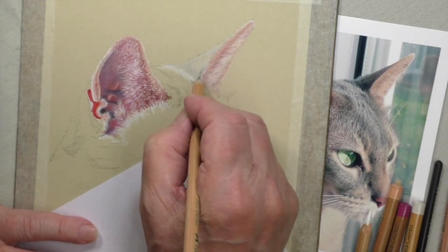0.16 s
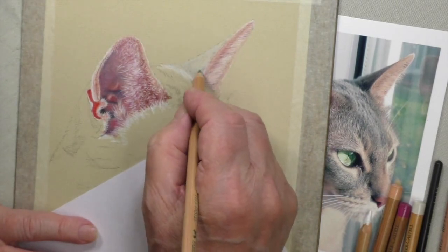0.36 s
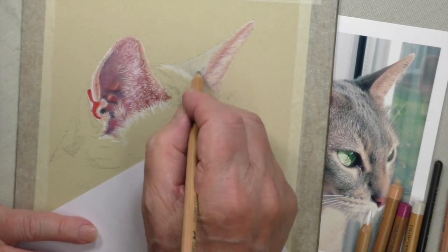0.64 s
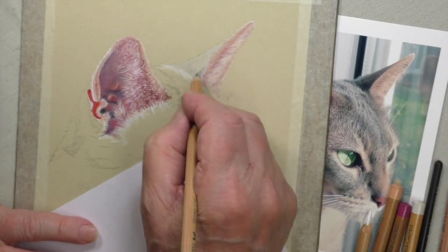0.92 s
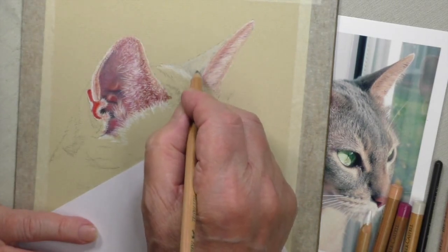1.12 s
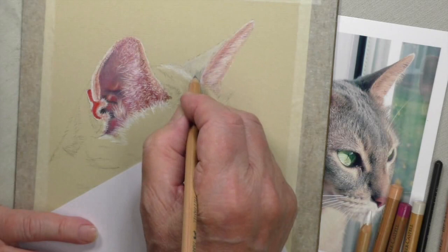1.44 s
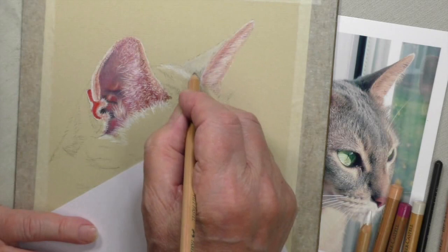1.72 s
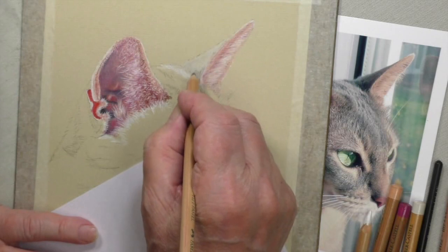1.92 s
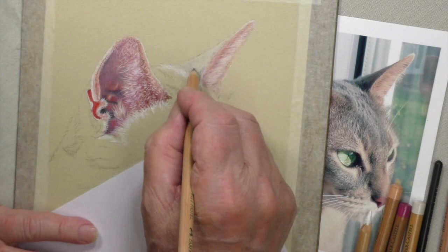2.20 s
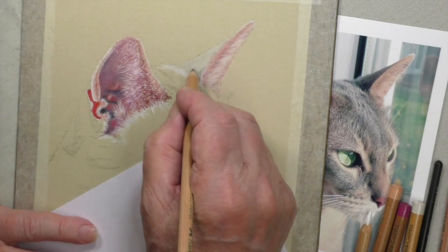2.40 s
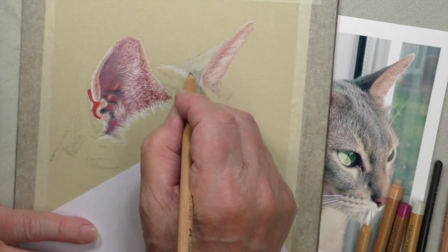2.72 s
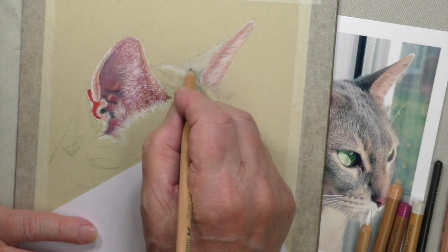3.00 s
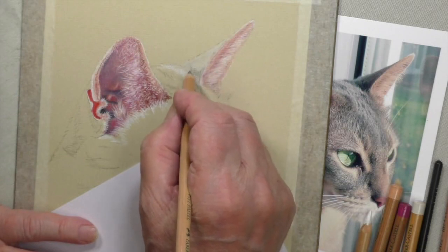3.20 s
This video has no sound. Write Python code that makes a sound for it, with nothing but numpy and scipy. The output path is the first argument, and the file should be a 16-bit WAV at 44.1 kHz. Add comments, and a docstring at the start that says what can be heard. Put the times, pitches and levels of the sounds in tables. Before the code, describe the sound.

A pastel pencil draws short strokes on board-backed paper, close in a small dry room. From 0 to 1.4 s, light, crisp, hissing scratches come about every quarter second, most beginning with a dull tap, strongest near 1.0 s. A quick pair falls around 1.45-1.65 s. Then strokes grow louder, duller and woodier, slightly softer near 2.4-2.6 s, with taps nearly gone after 2.2 s. Faint low hum and hiss continue to 3.4 s.

```python
"""In a quiet room, close by, a pastel pencil lays short, quick strokes on paper fixed to a drawing board.
The tip mostly taps down first: a dull push that rings the board. It then drags over the paper's tooth.
Tiny random impacts drum on the board's modes, mostly louder and duller in the later strokes,
and coloured noise gives the hiss of crumbling pigment, which follows the tip's speed.
A low wavering hum (sines) and a faint hiss (noise) lie underneath."""
import sys
import numpy as np
from scipy import signal
from scipy.fft import rfft, irfft, next_fast_len
from scipy.io import wavfile
from scipy.ndimage import map_coordinates

SR = 44100
rng = np.random.default_rng(int(sys.argv[2]) if len(sys.argv) > 2 else 0)


def waveform_to_disk(signal):
    """Save audio, clipped to [-1, 1], as 16-bit WAV at the path in sys.argv[1]."""
    frames = np.transpose(np.atleast_2d(signal))
    scaled = np.clip(frames, -1, 1) * 32767
    samples = np.round(scaled).astype(np.int16)
    wavfile.write(sys.argv[1], SR, samples)


N = 147735  # length in samples

# The pencil strokes: [start/s, length/s, board level/dB, high modes over low modes/dB,
# hiss level/dB, fastest point/share of the stroke]
STROKE_TABLE = [(-.075, 0.13, -26, 11, -25, 0.41), (0.183, 0.14, -31.5, 7, -27, 0.43),
                (0.45, .13, -31, 9, -29, 0.52), (0.716, 0.14, -31, 4.5, -28.5, 0.53),
                (0.97, 0.14, -30.5, 5.5, -28, 0.33), (1.198, 0.13, -30, 4.5, -30, 0.48),
                (1.441, 0.12, -32.5, 8.5, -28.5, 0.36), (1.553, 0.12, -22.5, 6, -29.5, 0.54),
                (1.769, 0.13, -22.5, 1, -31, 0.54), (1.974, 0.12, -23, -4, -30.5, 0.61),
                (2.177, .13, -22.5, -3.5, -31, 0.55), (2.396, .108, -27.5, -1, -39, 0.56),
                (2.588, 0.13, -26, -3.5, -34.5, 0.6), (2.813, 0.14, -22, -1, -32, 0.62),
                (3.035, 0.14, -21.5, -2.5, -32.5, 0.63), (3.265, 0.13, -21, 1, -30.5, 0.73)]


def amp(db):
    """Turn decibels into a gain."""
    return 10 ** (np.asarray(db) / 20)


def unit(x):
    """Scale to an rms of 1."""
    return x / np.sqrt(np.mean(x ** 2) + 1e-20)


def along(points, hz):
    """Read a curve of (f/Hz, value) points, with the frequency on a log axis."""
    f, value = np.transpose(points)
    return np.interp(np.log(hz + 1), np.log(f + 1), value)


def wobble(rate):
    """A smooth random curve with rate new random points a second."""
    knots = rng.standard_normal(N // 20)
    return map_coordinates(knots, [np.arange(N) * rate / SR], mode="mirror")


def filtered(x, response):
    """Filter x by multiplying its spectrum with a response that depends on frequency."""
    size = next_fast_len(N + SR // 10)
    hz = np.fft.rfftfreq(size, 1 / SR)
    return irfft(rfft(x, size) * response(hz), size)[..., :N]


def stereo(pair, spectrum, alike):
    """Colour two unrelated signals and mix them into a left and right that are partly alike, at rms 1."""
    def mid_side_response(hz):
        # the angle sets how much is shared: 0 makes both sides the same
        angle = np.arccos(np.clip(along(alike, hz), -1, 1)) / 2
        return amp(along(spectrum, hz)) * [np.cos(angle), np.sin(angle)]

    mid, side = filtered(pair, mid_side_response)
    return unit(np.array([mid + side, mid - side]))


HUM_WAVER_DB, HUM_DRIFT_RAD = 0.6, 0.58  # random swing of the hum's level and phase
FLOOR_DB = -48  # rms of the room noise


def background():
    """Low hum tones, wavering in level and phase, over the room's steady coloured noise."""
    # hum tones: [f/Hz, rms level/dB]
    hum_tones = [(52.9, -52), (105.7, -53), (175.6, -52)]
    # colour of the room noise: [f/Hz, level/dB]
    floor_colour = [(20, -14), (40, -26), (75, -8), (130, -2.5), (190, -6), (280, -15.5), (500, -23),
                    (1000, -25.5), (2000, -26), (4000, -30), (8000, -28), (12000, -35), (15000, -40)]
    # how alike left and right are in the room noise: [f/Hz, correlation]
    floor_alike = [(100, 1), (1000, 0.39), (5000, 0.13)]
    t = np.arange(N) / SR
    hum = np.zeros(N)
    for hz, db in hum_tones:
        level = amp(db + HUM_WAVER_DB * wobble(5.16))
        phase = 2 * np.pi * hz * t + HUM_DRIFT_RAD * wobble(3.82)
        hum += level * np.sqrt(2) * np.sin(phase)
    noise = stereo(rng.standard_normal((2, N)), floor_colour, floor_alike)
    return hum + amp(FLOOR_DB) * noise


ROOM_WIDTH = 0.32  # share of side signal in the reflections


def room(x, count=14):
    """Fading noise as a small, dry room; the moving hand shifts the reflections in count steps."""
    # time for the reflections to fade by 60 dB: [f/Hz, fade time/s]
    fade_times = [(200, 0.11), (900, 0.2), (2500, 0.13), (10000, 0.087)]
    noise = rng.standard_normal((count, 2, SR // 4))
    hz, t, bands = signal.stft(noise, SR, nperseg=256)
    fade = amp(-60 * t / along(fade_times, hz)[:, None])
    tails = signal.istft(bands * fade, SR, nperseg=256)[1]
    wet = np.zeros((2, N + SR))
    for part, tail in zip(np.array_split(np.arange(N), count), tails):
        tail = tail / np.linalg.norm(tail[0])
        answer = signal.fftconvolve(x[part][None], tail, axes=1)
        wet[:, part[0]:part[0] + answer.shape[1]] += answer
    mid, side = wet[:, :N]
    return np.array([mid + ROOM_WIDTH * side, mid - ROOM_WIDTH * side])


BOARD_LOW_HZ, BOARD_TOP_HZ = 320, 3000  # the board's sound falls off below and above these


def board_response(hz):
    """Board and pencil ring in a set of resonances (modes); little bass is radiated."""
    # modes of board and pencil: [f/Hz, width/Hz, level/dB]
    board_modes = [(373.3, 49, -8.5), (504, 98, -5.5), (574.5, 41, 0), (653, 65, 2.5), (795, 57, 1.5),
                   (903, 103, -1.5), (999, 30.6, 0.5), (1072, 23.3, -3.5), (1252, 45.6, -3),
                   (1325, 130, -9), (1685, 94, -7.5), (1767, 82, -3), (1899, 42, -5.5), (2059, 102, -9.5)]
    modes = 0
    for k, (centre, width, db) in enumerate(board_modes):
        damping = 1j * hz * width
        sign = (-1) ** k  # neighbouring modes move opposite ways
        modes = modes + sign * amp(db) * damping / (centre * centre - hz * hz + damping)
    s = 1j * hz / BOARD_LOW_HZ
    bass_cut = (s * s / (1 + s + s * s)) ** 2
    return modes * bass_cut / (1 + (hz / BOARD_TOP_HZ) ** 8)


TAP_CYCLES, TAP_RING_DB = .4, -8.5  # width of the push in cycles; ring against the pushes
REBOUND_S, REBOUND_DB = 0.00393, -17.5  # the knock comes back off the desk
THUMP_HZ = 535  # a tap mostly rings the modes below this


def tapping():
    """Each touch is one dull push on the board, its rebound and the ring of the modes."""
    # the tip touching down, a softer contact being lower: [t/s, level/dB, pitch/Hz]
    taps = [(0.037, -23, 930), (.182, -13.5, 806), (.4502, -15.5, 790), (0.7073, -14, 704),
            (0.9701, -8.5, 824), (1.196, -11, 740), (1.399, -22.5, 624), (1.404, -24.5, 660),
            (1.7529, -17.5, 630), (1.9606, -14.5, 677), (2.171, -26.5, 620), (2.797, -38, 650),
            (3.024, -35, 660), (3.235, -37.5, 650)]
    knocks = np.zeros(N)
    t = np.arange(-SR // 100, SR // 50) / SR  # time around one touch

    def push(cycles):
        return -np.sin(2 * np.pi * cycles) * np.exp(-.5 * (cycles / TAP_CYCLES) ** 2)

    def thump_response(hz):
        return board_response(hz) / (1 + 1j * hz / THUMP_HZ) ** 4

    for touch_s, db, hz in taps:
        first = round((touch_s + t[0]) * SR)
        rebound = amp(REBOUND_DB) * push((t - REBOUND_S) * hz)
        knocks[first:][:len(t)] += amp(db) * (push(t * hz) + rebound)
    ring = unit(filtered(knocks, thump_response))
    return knocks + amp(TAP_RING_DB) * knocks.std() * ring


START_SPEED = 0.13  # share of top speed as the tip starts to drag


def sweep(start, length, fastest, rise, power):
    """One stroke's loudness: the tip makes contact, speeds up, slows and lifts."""
    u = (np.arange(N) / SR - start) / length  # place in the stroke, 0 to 1
    on = (u > 0) & (u < 1)
    u, level = u[on], np.zeros(N)
    fastest = np.clip(fastest, .1, .9)
    speeding_up = 1 - (1 - START_SPEED) * (1 - u / fastest) ** 2
    slowing = np.cos(np.pi / 2 * (u - fastest) / (1 - fastest)) ** 2
    speed = np.where(u < fastest, speeding_up, slowing)
    contact = np.sin(np.pi / 2 * np.minimum(u / rise, 1)) ** 2
    level[on] = np.abs(speed) ** power * contact
    return level


DRAG_SHARE, SPEED_POWER = 0.18, 1.85  # rise of the hiss as share of the stroke; hiss against speed
# for each dB of board level above PRESSED_DB, the hiss below the split gains HISS_DARKENS dB
PRESSED_DB, HISS_DARKENS, HISS_SPLIT_HZ = -27.5, 0.34, 5900
HISS_PAN_DB = 0.42  # left is raised and right lowered by this


def scratching():
    """Pigment crumbling off the tip: a dense hiss that grows with speed and darkens with pressure."""
    # colour of the tip's hiss: [f/Hz, level/dB]
    hiss_colour = [(500, -48), (1500, -16), (2300, -14.5), (2600, -6.5), (2900, -9), (3200, -20),
                   (3480, -8), (3700, -23), (3960, -24.5), (4200, -7), (4520, -12), (5350, -5.5),
                   (5800, -9.5), (6250, -5.5), (6600, -11), (7100, -6.5), (7480, -7), (7780, 1.5),
                   (8250, -0.5), (8450, -1), (8750, -3), (9300, -8), (10500, -3.5), (11100, -3),
                   (11700, -10.5), (12000, -13.5), (12400, -17), (13200, -9.5), (14000, -3), (14300, -6),
                   (14550, -8), (15100, -13), (16000, -36)]
    # how alike left and right are in the hiss: [f/Hz, correlation]
    hiss_alike = [(2000, 1), (4400, 0.51), (8000, 0.033), (15000, 0.07)]
    flicker_db = 1.55 * wobble(1200) + 1.0 * wobble(120)
    crumbs = stereo(rng.standard_normal((2, N)) * amp(flicker_db), hiss_colour, hiss_alike)
    low = filtered(crumbs, lambda hz: 1 / (1 + (hz / HISS_SPLIT_HZ) ** 4))
    out = np.zeros((2, N))
    for start, length, board_db, _, hiss_db, fastest in STROKE_TABLE:
        dark = amp(HISS_DARKENS * (board_db - PRESSED_DB))
        loudness = amp(hiss_db) * sweep(start, length, fastest, DRAG_SHARE, SPEED_POWER)
        out += loudness * (crumbs + (dark - 1) * low)
    return out * amp([[HISS_PAN_DB], [-HISS_PAN_DB]])


def tooth(rate):
    """Tiny random impacts of the tip on the paper's grain, rate a second on average."""
    hits = rng.random(N) < rate / SR
    return unit(hits * rng.standard_normal(N))


GRAINS_PER_S, CHATTER_PER_S, CHATTER_DB = 2500, 130, -0.5  # impacts; speed and depth of the chatter
DULL_HZ = 950  # a slow tip mostly reaches the modes below this
# rise and earlier peak (shares of the stroke), level against speed: low modes, then high modes
DULL_RISE, DULL_LEAD, DULL_POWER = 0.037, 0.25, 1
BRIGHT_RISE, BRIGHT_LEAD, BRIGHT_POWER = 0.19, 0.077, 1.18
# the tip catches as it starts to drag
CATCH_AT_S, CATCH_WIDTH_S, CATCH_DB = 0.016, 0.0063, -8


def rubbing():
    """Grains drum on the board; the tip chatters as it catches and slips, dull first, brighter with speed."""
    t = np.arange(N) / SR
    grains = tooth(GRAINS_PER_S) * amp(CHATTER_DB * wobble(CHATTER_PER_S))
    dull = filtered(grains, lambda hz: 1 / (1 + (hz / DULL_HZ) ** 4))
    bright = grains - dull
    drive = np.zeros(N)
    for start, length, db, bright_db, _, fastest in STROKE_TABLE:
        catch = amp(CATCH_DB) * np.exp(-.5 * ((t - start - CATCH_AT_S) / CATCH_WIDTH_S) ** 2)
        low = dull * (catch + sweep(start, length, fastest - DULL_LEAD, DULL_RISE, DULL_POWER))
        high = bright * sweep(start, length, fastest - BRIGHT_LEAD, BRIGHT_RISE, BRIGHT_POWER)
        drive += amp(db) * (amp(-bright_db / 2) * low + amp(bright_db / 2) * high)
    # the level is set against grains that drum without a break
    sound, steady = filtered(np.array([drive, grains]), board_response)
    return sound / steady.std()


BOARD_SIDE_DB = -34.5  # slight left-right difference of the board
ROOM_DB, ROOM_HISS_DB = -10.5, -6.5  # how much board and hiss feed the room


def scene():
    """The board sounds from the middle, the hiss wide around it, with the room and its background."""
    board = rubbing() + tapping()
    hiss = scratching()
    side = amp(BOARD_SIDE_DB) * filtered(board, lambda hz: 1j * np.minimum(hz / 500, 2.6) ** 2)
    direct = np.array([board + side, board - side]) + hiss
    reflections = room(amp(ROOM_DB) * board + amp(ROOM_HISS_DB) * hiss[0])
    return direct + reflections + background()


def record(dry):
    """Nothing is kept above the band limit of 15500 Hz."""
    return filtered(dry, lambda hz: hz < 15500)


dry = scene()
out = record(dry)
waveform_to_disk(out)
```